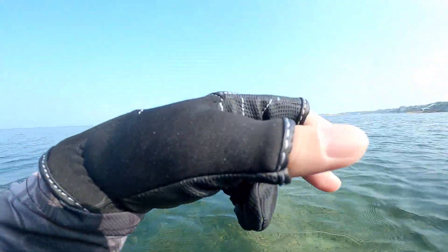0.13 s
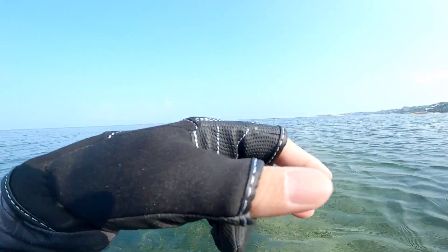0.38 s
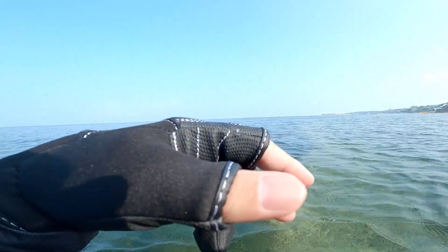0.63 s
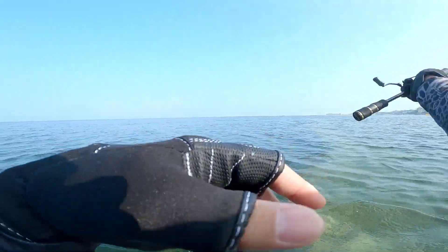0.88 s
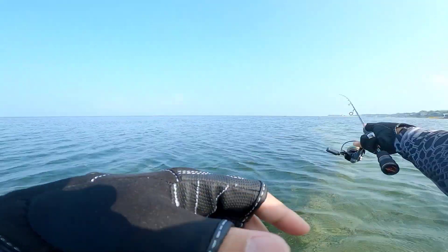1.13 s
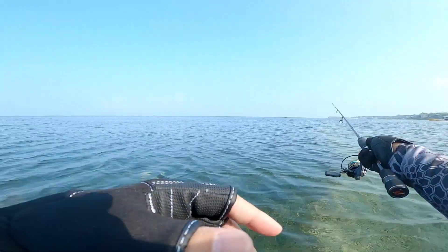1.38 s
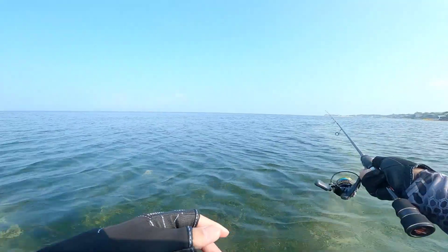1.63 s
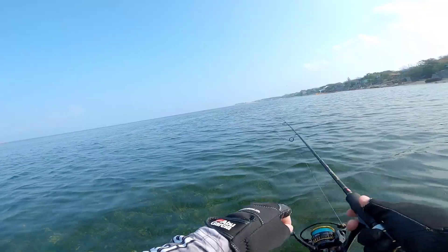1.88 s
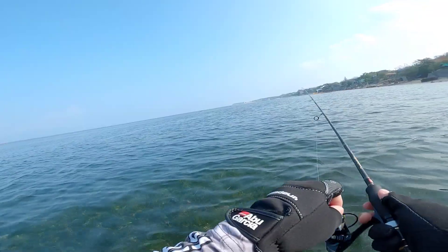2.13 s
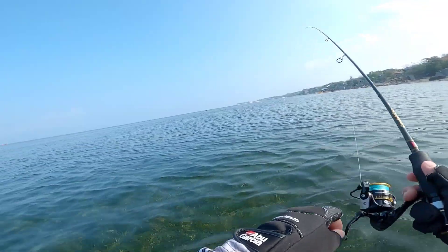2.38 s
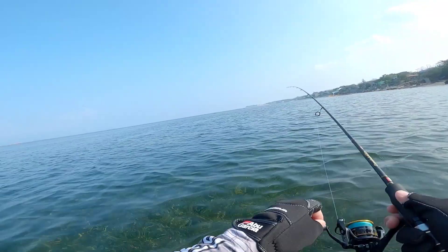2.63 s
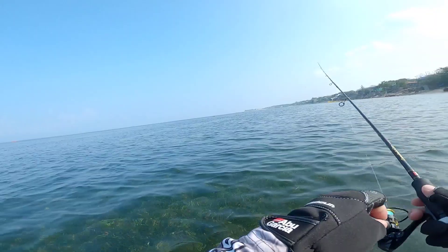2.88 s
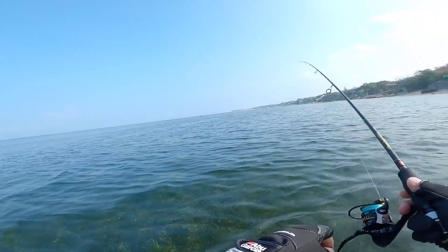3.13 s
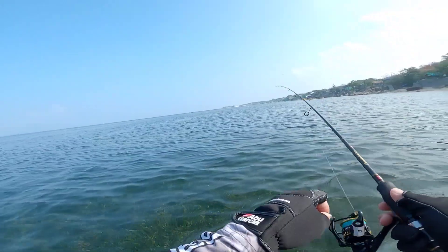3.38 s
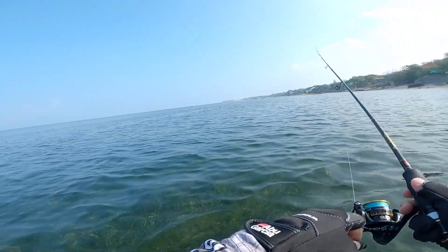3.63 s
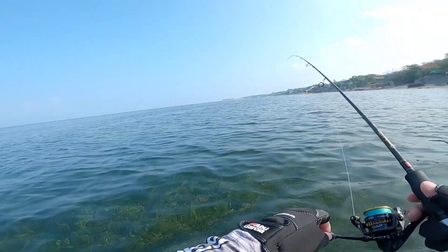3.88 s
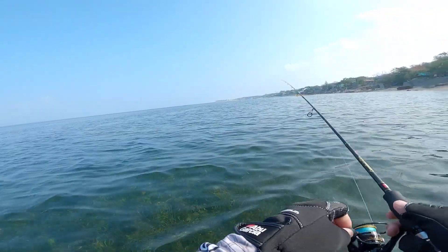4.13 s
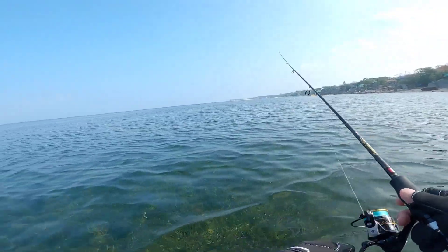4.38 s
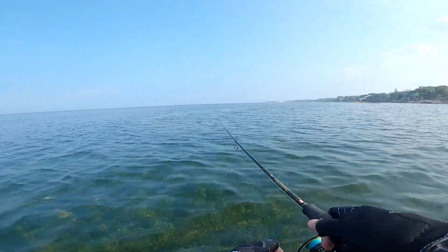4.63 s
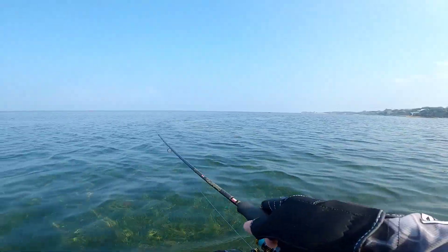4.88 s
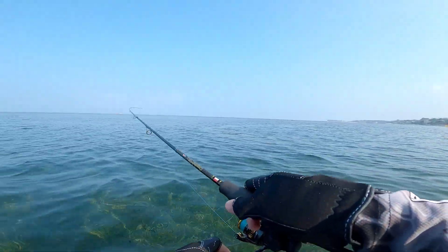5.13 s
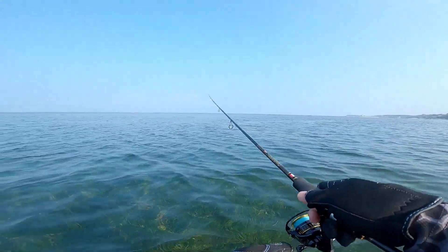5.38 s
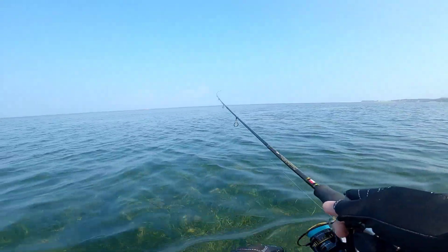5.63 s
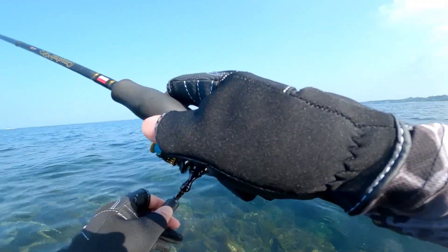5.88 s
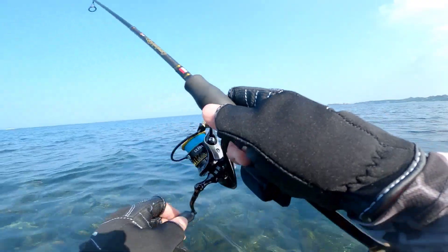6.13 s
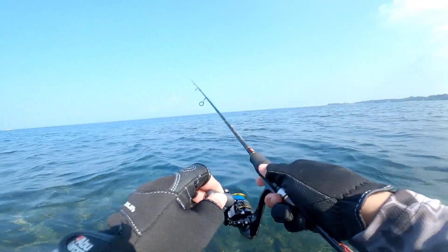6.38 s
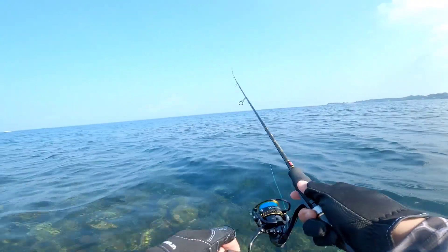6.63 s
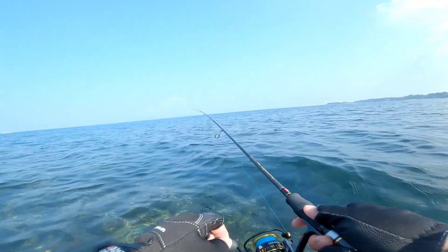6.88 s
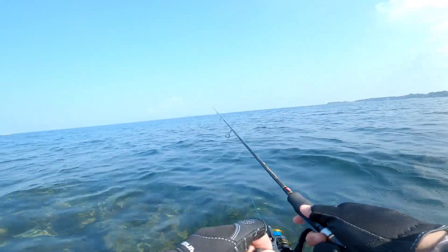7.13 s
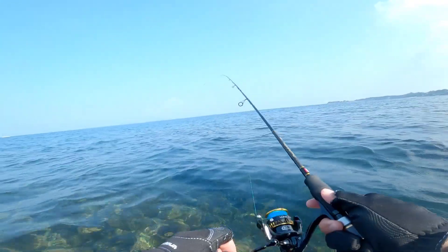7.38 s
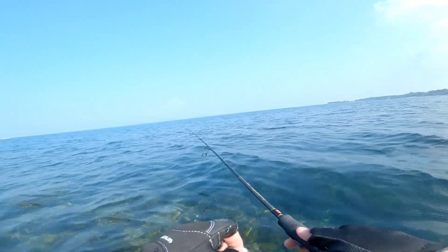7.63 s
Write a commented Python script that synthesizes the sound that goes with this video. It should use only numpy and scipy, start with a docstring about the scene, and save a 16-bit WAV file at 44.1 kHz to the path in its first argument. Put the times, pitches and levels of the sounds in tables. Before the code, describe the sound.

Close, windy sound of someone wading in the sea. First dull wind thumps and small underwater-like blips, then suddenly clear water: fizzing wash, sharp drips and plopping bubbles, with a wavering rooster crow far off on shore and a low motor hum. After a burst of buffeting and more splashes, everything turns muffled again, with steady rapid reel clicks under the gusts.

```python
"""An angler wades in shallow sea water; wind buffets a body-worn microphone and a far engine hums throughout.
At first the sound is muffled, with bubbles under the wind; at 1.9 s the treble opens on hissing spray and
splashes round the legs, and a cockerel crows on the shore. From 6 s the treble closes again and the reel
ticks fast. Wind and sea are shaped noise, bubbles and crow are gliding sines, the reel is struck modes."""
import sys
import numpy as np
from scipy import signal
from scipy.fft import rfft, irfft
from scipy.io import wavfile

SR = 44100
rng = np.random.default_rng(int(sys.argv[2]) if len(sys.argv) > 2 else 0)


def bounce(signal):
    """Save signal as a 16-bit WAV file at the path given by the first command-line argument."""
    frames = np.transpose(np.atleast_2d(signal))
    limited = np.clip(frames, -1, 1)
    pcm = np.round(limited * 32767).astype(np.int16)
    wavfile.write(sys.argv[1], SR, pcm)


def linear_from_db(decibels):
    """Turn decibels (scalar or array-like) into linear amplitude factors; 0 gives 1."""
    return 10 ** (np.asarray(decibels, float) / 20)


N = 342083

# how far the treble is open: t/s, openness/0-1
TREBLE_OPENNESS = [(1.9, 0), (1.97, 1), (6.04, 1), (6.07, 0)]
# colour of the dry tick of a water drop: f/Hz, relative level/dB
DROP_COLOUR = [(1500, -8), (3500, -10.5), (5000, 4.5), (7000, 12), (8500, -26.5), (11000, -10),
               (15500, -62)]


def rms_one(x):
    """Scale to rms 1."""
    return x / np.sqrt(np.mean(x ** 2) + 1e-20)


def in_time(rows):
    """Columns of a curve table after its time column, one value a sample."""
    s, *columns = np.transpose(rows)
    return [np.interp(np.arange(N) / SR, s, c) for c in columns]


def drift(rate_hz):
    """Slow random curve of spread 1: noise at every 40th sample through a double one-pole low-pass."""
    pole = np.exp(-2 * np.pi * rate_hz * 40 / SR)
    noise = rng.standard_normal(N // 40 + 2002)
    slow = signal.lfilter([1], [1, -2 * pole, pole * pole], noise)[2000:]   # past the settling
    return np.interp(np.arange(N) / 40, np.arange(len(slow)), rms_one(slow))


def coloured(x, spectrum):
    """Shape to a spectrum, interpolated in dB over log frequency."""
    hz, db = np.transpose(spectrum)
    bins = np.maximum(np.arange(N // 2 + 1) * SR / N, 1)
    return irfft(rfft(x) * linear_from_db(np.interp(np.log(bins), np.log(hz), db)), N)


def bandpass(x, low_hz, high_hz):
    """Gentle Butterworth band-pass."""
    return signal.sosfilt(signal.butter(2, [low_hz, high_hz], "band", fs=SR, output="sos"), x)


def banded(spectrum, shared_db, own_db, rate_hz, count):
    """Noise in narrow bands that swell partly together, partly alone, then shaped to the spectrum; rms 1."""
    edges = np.geomspace(spectrum[0][0], min(spectrum[-1][0], .45 * SR), count + 1)
    white = rng.standard_normal((2, N))
    together, out = drift(rate_hz), 0
    for k in range(count):
        band = bandpass(white[k % 2], edges[k], edges[k + 1])
        out = out + band * linear_from_db(shared_db * together + own_db * drift(rate_hz))
    return rms_one(coloured(out, spectrum))


def swells(level_db, s, peak_db, rise_s, fall_s, hold_s=0):
    """Gain of a level with swells added in power: each grows, holds and dies away exponentially."""
    t = np.arange(0, N, 40)[:, None] / SR - s
    shape = np.exp(np.minimum(t, 0) / rise_s - np.maximum(t - hold_s, 0) / fall_s)
    power = np.sum((linear_from_db(peak_db) * shape) ** 2, axis=1)
    return np.sqrt(linear_from_db(level_db) ** 2 + np.interp(np.arange(N) / 40, np.arange(len(t)), power))


def add_bubble(out, s, level_db, hz, length_s, glide):
    """One bubble: a dying sine whose pitch glides up, or down where negative (glide in octaves/s at birth)."""
    t = np.arange(int(length_s * SR)) / SR
    octaves = glide * length_s / 3 * np.tanh(3 * t / length_s)   # the glide levels off
    phase = 2 * np.pi * np.cumsum(hz * 2 ** octaves) / SR
    decay = linear_from_db(-25.0 * t / length_s - 40 * (t / length_s) ** 2)   # quick at the end
    soft_birth = 1 - np.exp(-t * hz / 0.7)
    at = int(s * SR)
    out[at:at + len(t)] += (linear_from_db(level_db) * decay * soft_birth * np.sin(phase))[:N - at]


def fizz(clumping, low_hz, high_hz, cycles, octaves, spread_db, count):
    """Random small bubbles in clumps, each ringing a few cycles and climbing in pitch; rms 1."""
    clock, out = np.cumsum(clumping), np.zeros(N)   # runs fast where bubbles crowd
    for when, size, pitch, climb in rng.random((count, 4)):
        hz = low_hz * (high_hz / low_hz) ** pitch
        s = np.searchsorted(clock, when * clock[-1]) / SR
        level_db = -spread_db * np.log(size + 0.014)   # few are loud
        add_bubble(out, s, level_db, hz, cycles / hz, climb * octaves * hz / cycles)
    return rms_one(out)


def engine():
    """Two low orders of a far motor, wavering over the water."""
    # firing rate and its harmonics: t/s, f/Hz, first order level/dB, second order level/dB
    motor = [(0, 79.04, -51, -42.5), (.8, 78.43, -44.5, -43), (1.8, 78.4, -44.5, -46.5),
             (2.1, 76.1, -32.5, -43), (4.5, 75.53, -35.5, -48), (5.3, 76.2, -52, -46),
             (7.76, 75.8, -43.5, -58.5)]
    hz, *orders_db = in_time(motor)
    phase = 2 * np.pi * np.cumsum(hz * (1 + 0.0093 * drift(5.73))) / SR
    out = np.zeros(N)
    for order, db in enumerate(orders_db, start=1):
        out += np.sqrt(2) * linear_from_db(db + 0.6 * drift(16.0)) * np.sin(order * phase)
    return out


def wind():
    """Eddies press on the diaphragm in lumps: low rumble and higher buffeting, with short puffs on top."""
    # slow strength of the wind: t/s, rumble level/dB, buffeting level/dB
    strength = [(0, -35, -63), (.5, -43.5, -46.5), (.828, -34.5, -42), (.84, -34.5, -26.5),
                (1.1, -30.5, -19.5), (1.3, -32.5, -27), (1.34, -36.5, -37), (1.42, -25.5, -50),
                (1.86, -37, -47), (2.0, -40.5, -39.5), (3.2, -38, -41), (3.43, -22, -36.5),
                (3.62, -40.5, -45.5), (4.5, -47.5, -37), (5.25, -28, -44.5), (5.4, -20.5, -47),
                (5.75, -21.5, -18.5), (5.98, -26.5, -23), (6.05, -33, -45), (6.15, -25.5, -30),
                (6.85, -34, -20.5), (7.17, -27, -33.5), (7.26, -33.5, -23.5), (7.58, -21.5, -31.5),
                (7.76, -27.5, -13)]
    # single puffs on top of it: t/s, rumble level/dB, buffeting level/dB
    puffs = [(0.039, -25, -35.5), (0.472, -28.5, -54), (0.661, -35, -26), (0.847, -22.5, -15.5),
             (0.913, -35.5, -14), (0.957, -33, -12.5), (1.102, -29, -18.5), (1.169, -39, -18.5),
             (1.532, -17.5, -28), (1.956, -25, -22), (2.309, -21, -32), (3.822, -19, -52), (4.25, -27, -49),
             (4.67, -24, -37), (4.768, -17, -49), (4.922, -15, -48), (5.006, -14.5, -57), (5.156, -22, -38),
             (5.338, -13, -29), (5.379, -32, -14), (5.457, -35, -7), (5.568, -30, -11.5),
             (5.721, -12.5, -21), (6.22, -24, -18), (6.443, -24, -18), (6.72, -27, -26),
             (6.999, -18.5, -22.5), (7.369, -25.5, -22), (7.538, -36.5, -17.5), (7.699, -32, -14)]
    # colour of the rumble: f/Hz, relative level/dB
    rumble_colour = [(12, -35.5), (20, -5), (38, 3), (50, -3), (81, -5.5), (113, -10), (200, -44),
                     (260, -45.5), (440, -120)]
    # colour of the buffeting: f/Hz, relative level/dB
    buffet_colour = [(35, -26), (60, 9.5), (83, 9), (171, 0.5), (209, -2.5), (290, -9.5), (501, -22),
                     (1590, -53.5), (2500, -68), (3250, -95), (5500, -120)]
    rumble_db, buffet_db = in_time(strength)
    s, rumble_puff_db, buffet_puff_db = np.transpose(puffs)
    rumble = banded(rumble_colour, shared_db=-2.5, own_db=1.0, rate_hz=8.8, count=6)
    buffet = banded(buffet_colour, shared_db=3.5, own_db=2.5, rate_hz=36.5, count=10)
    openness, = in_time(TREBLE_OPENNESS)
    body = bandpass(buffet, 140, 620)
    buffet = buffet + linear_from_db(-6.5) * (1 - openness) * body   # the muffled sound is fuller
    rumble_gain = swells(rumble_db, s, rumble_puff_db, rise_s=.007, fall_s=.014)
    buffet_gain = swells(buffet_db, s, buffet_puff_db, rise_s=.007, fall_s=.014)
    return rumble_gain * rumble + buffet_gain * buffet


def sea():
    """A dull wash and a bright hiss; where the water splashes, small bubbles and fine drops."""
    # the sea between the sloshes: t/s, wash level/dB, hiss level/dB
    calm = [(0, -47.5, -69), (.65, -57, -74.5), (.86, -53.5, -67.5), (1.12, -35.5, -63.5),
            (1.35, -49.5, -65.5), (1.9, -54, -66.5), (2.01, -45.5, -59.5), (2.44, -47, -51),
            (3.2, -47.5, -50), (4.0, -48.5, -52.5), (4.25, -48, -59.5), (5.3, -48.5, -58.5),
            (5.55, -57, -51.5), (5.92, -44, -61), (6.02, -67, -87.5), (6.07, -54, -86),
            (6.14, -42.5, -72.5), (6.67, -50, -67), (7.76, -47.5, -67)]
    # sloshes against the legs: t/s, hold/s, wash level/dB, hiss level/dB, splashing level/dB
    sloshes = [(2.066, 0.15, -46.5, -56, -56.5), (2.443, 0.065, -56, -46.5, -55.5),
               (2.68, 0.052, -47, -70, -50), (3.186, 0.0086, -59, -70, -63),
               (3.597, 0.046, -69, -44, -48.5), (3.682, 0.16, -54, -62, -45),
               (3.927, 0.0089, -34.5, -68, -64), (4.051, .02, -35.5, -52, -56),
               (4.435, 0.05, -76, -53.5, -79), (4.756, 0.09, -49, -55, -74), (5.44, 0.036, -42, -74, -57.5),
               (5.545, 0.053, -54, -70, -54.5), (5.713, 0.0096, -51.5, -53, -45),
               (5.816, 0.075, -42, -51.5, -54.5), (5.93, 0.062, -65, -85, -65)]
    # colour of the wash: f/Hz, relative level/dB
    wash_colour = [(150, -28), (250, 1.5), (352, -4), (392, 1), (553, -4), (826, -12), (1110, -17.5),
                   (1760, -35.5), (2600, -52.5), (3380, -74), (5720, -120)]
    # colour of the open hiss: f/Hz, relative level/dB
    spray_colour = [(1000, 1), (1600, -1.5), (1900, -6), (2600, -4), (4050, -6), (4400, -13.5), (5700, -9),
                    (6750, 0.5), (7300, -6), (8300, -19.5), (9300, -30), (10200, -28), (13000, -36),
                    (15600, -47)]
    # colour of the hiss while muffled: f/Hz, relative level/dB
    muffled_colour = [(1500, 0), (2500, -8.5), (5700, -15.5), (6300, -22), (9000, -36)]
    # colour of the pattering drops at the microphone: f/Hz, gain/dB
    patter_colour = [(600, -4), (3900, 4), (4600, -2.5), (5600, -6.5), (6700, 1.5), (9000, 2.5)]
    wash_db, hiss_db = in_time(calm)
    trickle_db = hiss_db - 9.5   # splashing between the sloshes
    s, hold_s, *slosh_db = np.transpose(sloshes)
    wash_gain, hiss_gain, splash_gain = (
        swells(db, s, peak_db, rise_s=.009, fall_s=.047, hold_s=hold_s)
        for db, peak_db in zip((wash_db, hiss_db, trickle_db), slosh_db))
    wash = banded(wash_colour, shared_db=2.0, own_db=2.5, rate_hz=10.9, count=9)
    spray = banded(spray_colour, shared_db=1.8, own_db=3, rate_hz=14.0, count=9)
    gurgle = fizz(linear_from_db(5.5 * drift(7.4)), low_hz=520, high_hz=2400, cycles=18, octaves=.5,
                  spread_db=3.0, count=900)
    patter = fizz(linear_from_db(4.0 * drift(9.0)), low_hz=2000, high_hz=7300, cycles=20, octaves=.4,
                  spread_db=3.2, count=3200)
    ticks = (rng.random(N) < 200.0 / SR) * rng.laplace(size=N)   # about 200 a second
    ticks = rms_one(coloured(ticks, DROP_COLOUR))
    splash = linear_from_db(1.9) * gurgle + coloured(patter, patter_colour) + linear_from_db(-7.0) * ticks
    openness, = in_time(TREBLE_OPENNESS)
    dull_hiss = rms_one(coloured(rng.standard_normal(N), muffled_colour))
    hiss = openness * spray + (1 - openness) * dull_hiss
    return wash_gain * wash + hiss_gain * hiss + splash_gain * openness * splash


def splashes():
    """The loud bubbles and drops; a drop is a crack of noise and a short ring."""
    # single bubbles: t/s, level/dB, pitch f/Hz, length/s, glide at birth/(octaves/s)
    bubbles = [(.006, -39, 930, 0.042, -13), (0.076, -33.5, 906, 0.021, 1), (.175, -47, 797, 0.13, 4),
               (0.253, -40.5, 1004, 0.096, 8.5), (1.169, -40.5, 1090, 0.029, -10),
               (1.262, -40, 875, 0.069, 6), (1.765, -48, 1090, 0.051, 10),
               (3.614, -40.5, 1740, 0.028, 51.5), (5.62, -38.5, 1206, 0.06, 23),
               (5.717, -39, 1010, 0.038, 5), (1.43, -52, 1430, 0.031, 2), (1.541, -48.5, 1330, 0.027, 11),
               (1.672, -38, 1233, 0.047, -7), (1.712, -40.5, 710, 0.13, 3.5),
               (1.799, -41.5, 1174, 0.036, 1.5), (2.07, -48, 1250, .046, 23), (2.148, -43, 1960, 0.031, 7),
               (2.073, -39.5, 1500, 0.072, 42), (2.199, -23.5, 1250, 0.023, -8),
               (2.223, -34.5, 767, 0.057, 25), (2.245, -26, 1200, 0.02, -9), (2.285, -36, 1450, 0.024, -4),
               (2.377, -21, 413, 0.1, 11.5), (2.646, -34, 840, .035, 3), (1.57, -52, 1360, .032, -5),
               (2.774, -24, 1410, 0.011, 13.7), (3.41, -37.5, 1660, 0.032, -2),
               (3.423, -37, 1390, 0.026, 4), (3.563, -24.5, 1410, 0.049, 7), (3.664, -36, 944, 0.06, 35),
               (3.755, -19, 1460, 0.016, -4), (3.778, -30, 1320, 0.028, -8.5), (3.788, -27, 400, .06, 5),
               (3.826, -24, 390, .045, 4), (3.844, -27, 490, .04, 2), (3.862, -36, 540, .04, 4),
               (3.793, -32, 1900, .026, 40), (3.914, -25, 680, .03, -6), (3.929, -24, 660, .035, -8),
               (5.556, -33, 780, .036, 100), (5.565, -34, 1250, .02, 40), (5.5875, -29, 1400, .032, 55),
               (3.885, -28, 1550, 0.022, 24), (4.059, -28, 2432, 0.014, 3), (4.428, -35, 1390, 0.029, -10),
               (1.06, -35, 1230, 0.018, -5), (5.451, -33.5, 1130, 0.048, 2),
               (5.465, -29, 1250, 0.046, 52.5), (5.491, -39, 1496, 0.085, -13),
               (5.573, -32.5, 563, 0.1, 2.5), (5.598, -36.5, 755, 0.1, 29.5), (5.736, -33, 994, 0.03, -4),
               (5.805, -30.5, 830, 0.072, -1.5), (5.987, -45, 990, 0.063, 31),
               (6.028, -40.5, 885, 0.033, 8)]
    # the loudest drops that hit the surface: t/s, relative level/dB, pitch f/Hz
    drops = [(2.07, -35, 4060), (2.106, -33.5, 3170), (2.189, -33, 2440), (2.231, -36.5, 2740),
             (2.278, -33.5, 7200), (2.293, -27.5, 3570), (2.6761, -31, 2520), (2.688, -23, 6000),
             (2.689, -30, 3940), (2.695, -34.5, 6240), (2.706, -35, 2670), (2.716, -24.5, 6970),
             (2.717, -33, 3950), (2.74, -33, 3620), (2.747, -32, 3840), (2.7737, -23.5, 6400),
             (2.7862, -25, 6650), (2.7868, -25, 4100), (2.8314, -16, 5950), (2.838, -23.5, 3960),
             (2.889, -23.5, 6900), (2.898, -28, 6600), (2.907, -26, 6400), (2.9262, -29, 3960),
             (2.931, -28.5, 3150), (3.177, -20.5, 5860), (3.188, -18, 5800), (3.323, -21.5, 3420),
             (3.344, -22.5, 3100), (3.4239, -22, 5900), (3.506, -25, 6600), (3.5635, -26, 6830),
             (3.607, -21.5, 4830), (3.618, -39.5, 6260), (3.694, -15, 3400), (3.7015, -19, 4040),
             (3.7052, -20.5, 3770), (3.704, -39.5, 6430), (3.719, -20, 3730), (3.727, -17, 2990),
             (3.724, -24, 3900), (3.734, -30.5, 3400), (3.737, -46.5, 6700), (3.743, -32.5, 3900),
             (3.766, -40, 3950), (3.779, -25.5, 3700), (3.7838, -16, 6600), (3.793, -25, 6700),
             (3.813, -39, 6660), (3.8243, -12.5, 2710), (3.832, -22, 3850), (3.84, -20, 3330),
             (3.839, -41, 6480), (3.861, -27.5, 3000), (3.868, -32, 2800), (3.89, -32, 3200),
             (3.921, -28, 2270), (3.931, -40, 5500), (3.976, -37, 3280), (4.0106, -31, 6700),
             (4.644, -30, 3280), (4.823, -31, 6500), (5.339, -32, 6840), (5.349, -25.5, 6800),
             (5.4463, -25.5, 6500), (5.446, -30.5, 3960), (5.463, -29.5, 3170), (5.475, -43, 3430),
             (5.495, -30, 3620), (5.521, -30, 3700), (5.553, -24.5, 3270), (5.563, -32, 3260),
             (5.5733, -37, 2840), (5.593, -32, 2800), (5.608, -31.5, 2220), (5.632, -29, 2270),
             (5.6942, -31.5, 3200), (5.7175, -33.5, 4740), (5.725, -32, 4100), (5.7252, -41, 2720),
             (5.7377, -25, 3220), (5.816, -21.5, 4000), (5.826, -28, 6640), (5.8475, -32, 3200),
             (5.846, -30, 6700), (5.893, -36.5, 3140), (5.9557, -28, 3720), (6.016, -33.5, 6840),
             (6.026, -38.5, 3540)]
    # drops that only snap, broad and dry: t/s, relative level/dB
    dry_snaps = [(1.999, -27.5), (2.638, -28.5), (2.834, -16.5), (3.8235, -15), (3.932, -17), (5.588, -41),
                 (5.598, -38), (5.943, -25.5), (6.0527, -39)]
    rings, hits, snaps = np.zeros(N), np.zeros(N), np.zeros(N)
    for row in bubbles:
        add_bubble(rings, *row)
    rings *= linear_from_db(2.5 * drift(90))   # the churning surface roughens the rings
    for s, db, hz in drops:
        add_bubble(rings, s, db - 2.5, hz, 22 / hz, 30)
        hits[int(s * SR)] = linear_from_db(db - 16.5)
    for s, db in dry_snaps:
        snaps[int(s * SR)] = linear_from_db(db)
    crack_decay = np.exp(-1 / (0.0027 * SR))
    cracks = signal.lfilter([1], [1, -crack_decay], hits + 1e-18) * rng.standard_normal(N)
    thud = bandpass(snaps + 1e-18, 450, 4200)
    slap = bandpass(cracks, 1300, 4300)
    return rings + coloured(cracks + snaps, DROP_COLOUR) + linear_from_db(6) * thud + linear_from_db(2) * slap


def cockerel():
    """Five partials on a slightly unsteady pitch, scintillating with the distance."""
    # the crow, one table a note: t/s, pitch f/Hz, fundamental level/dB, overtones level/dB
    crow = [
        [(2.44, 633, -67, -77), (2.55, 601, -50, -52.5), (2.655, 583, -60, -54.5)],
        [(2.768, 695, -36, -68), (2.795, 850, -38, -52), (2.87, 798, -40, -49), (2.93, 817, -50, -50.5),
         (3.126, 821, -43, -49.5), (3.2, 818, -76, -54)],
        [(3.37, 657, -47, -60), (3.44, 686, -37, -54)],
        [(3.43, 798, -41, -57), (3.462, 786.6, -44.5, -50), (3.73, 764.4, -44.5, -51.5),
         (3.9, 747.5, -40.5, -51), (4.05, 744.5, -45.5, -60), (4.134, 730, -47.5, -55.5),
         (4.172, 626, -38, -62), (4.2, 624, -39, -58), (4.28, 608, -47, -62.5), (4.34, 530, -58, -86)],
    ]
    # colour of the overtones: f/Hz, gain/dB
    throat = [(1100, 2.5), (1600, -0.5), (1900, -1), (2350, -0.5), (2500, -8), (3050, -9), (3300, -1.5),
              (3600, -31)]
    out, t = np.zeros(N), np.arange(N) / SR
    # a second tone about 41 Hz under the fundamental makes it throb for a moment
    throbbing = (t > 2.96) & (t < 3.17)
    lag = 2 * np.pi * 41 * t + drift(30.0)
    for note in crow:
        hz, first_db, overtones_db = in_time(note)
        fade = np.clip(np.minimum(t - note[0][0], note[-1][0] - t) / 0.0098, 0, 1)
        phase = 2 * np.pi * np.cumsum(hz * (1 + 0.00914 * drift(38.9))) / SR
        for k in range(5):
            tone = np.sin((k + 1) * phase + 0.35 * k * drift(60.0))   # the higher, the hoarser
            if k == 0:
                db = first_db
                tone += throbbing * 0.9 * np.sin(phase - lag)
            else:
                db = overtones_db + np.interp((k + 1) * hz, *np.transpose(throat))
            flicker_db = 3 * drift(12.0) + 3 * drift(70.0)
            out += fade * np.sqrt(2) * linear_from_db(db + flicker_db) * tone
    return out


def reel():
    """Gear ticks at a steady beat ring the reel's modes, over a whirr that swells and brightens with effort."""
    # turns of the crank on which it rattles harder: t/s, hold/s, level/dB
    hard_turns = [(6.187, 0.26, -51.5), (6.995, 0.11, -51), (7.335, 0.16, -46)]
    # modes of the reel: f/Hz, relative level/dB, t60/s
    modes = [(420, -0.5, 0.063), (900, 3, 0.026), (1060, 1, 0.022), (1250, -3.5, 0.029), (1485, -6, 0.0098),
             (2000, -17.5, 0.018)]
    # looser knocks off the beat: t/s, level against a tick/dB
    offbeats = [(6.14, -5), (6.183, -2), (6.447, 3.5), (6.555, 2), (6.989, -5), (7.289, -7), (7.405, -4),
                (7.452, -18)]
    # ticks that stand out or fall back: t/s, level against a tick/dB
    accents = [(6.288, 4), (6.33, -4), (6.373, 5), (6.63, -4), (6.754, 4), (7.05, 5), (7.092, 5),
               (7.346, -6), (7.388, 3), (7.43, 5), (7.473, 4)]
    # centre of the whirr's whine, brighter on the hard turns: t/s, f/Hz
    whine_pitch = [(6.1, 900), (6.34, 1552), (6.48, 1000), (6.95, 900), (7.04, 1390), (7.15, 900),
                   (7.25, 944), (7.45, 1553), (7.6, 991)]
    # colour of the whirr's noise: f/Hz, relative level/dB
    whirr_colour = [(300, -9), (430, 0.5), (700, -15.5), (960, 13), (1250, 7), (1500, -8.5), (1750, -22),
                    (2100, -21), (2500, -45), (3500, -68.5), (6000, -110)]
    base_db, start_s, ticks_per_s = -51.5, 6.006, 23.63
    s, hold_s, turn_db = np.transpose(hard_turns)
    level = swells(base_db, s, turn_db, rise_s=.019, fall_s=.025, hold_s=hold_s)
    level *= np.clip((np.arange(N) / SR - start_s) / 0.26, 0, 1)   # fades in

    knocks = list(offbeats)
    for beat_s in np.arange(6.1185, N / SR, 1 / ticks_per_s):
        accent_db = sum(db for when, db in accents if abs(when - beat_s) < .5 / ticks_per_s)
        knocks.append((beat_s, accent_db))
    knock_s, knock_db = np.transpose(knocks)
    at, ticks = (knock_s * SR).astype(int), 0
    chance = rng.standard_normal((len(at), len(modes) + 1))   # one column a mode, the last for all
    for k, (hz, db, t60) in enumerate(modes):
        clicks = np.zeros(N)
        chance_db = 1.2 * chance[:, -1] + 2.8 * chance[:, k]
        clicks[at] = linear_from_db(12.5 + db + knock_db + chance_db) * (-1) ** k   # modes alternate in sign
        r, w = linear_from_db(-60 / (t60 * SR)), 2 * np.pi * hz / SR
        ticks = ticks + signal.lfilter([0, np.sin(w)], [1, -2 * r * np.cos(w), r * r], clicks + 1e-18)
    # dulled on the way through the body
    ticks = signal.sosfilt(signal.butter(6, 2300, fs=SR, output="sos"), ticks)

    hz, = in_time(whine_pitch)
    phase = 2 * np.pi * np.cumsum(hz) / SR
    slow = signal.sosfilt(signal.butter(2, 110, fs=SR, output="sos"), rng.standard_normal((2, N)))
    whine = rms_one(slow[0] * np.cos(phase) + slow[1] * np.sin(phase))   # noise band round the pitch
    whirr = rms_one(coloured(rng.standard_normal(N), whirr_colour)) + linear_from_db(1.5) * whine
    flutter = linear_from_db(-6 + 4 * drift(60.0))
    effort = (level / linear_from_db(base_db)) ** 0.43
    return level * (ticks + effort * flutter * whirr)


def scene():
    """All sources in the open air, on one channel."""
    return (engine() + wind() + sea() + splashes() + cockerel() + reel())[None]


def top_cut(x):
    """Nothing passes above the cut-off."""
    return signal.sosfilt(signal.butter(12, 15650, fs=SR, output="sos"), x)


def record(dry):
    """The loudest peaks, such as gusts, are rounded off by a soft limit at half of full scale."""
    mix = .5 * np.tanh(dry / .5)
    return top_cut(mix)


dry = scene()
out = record(dry)
bounce(out)
```